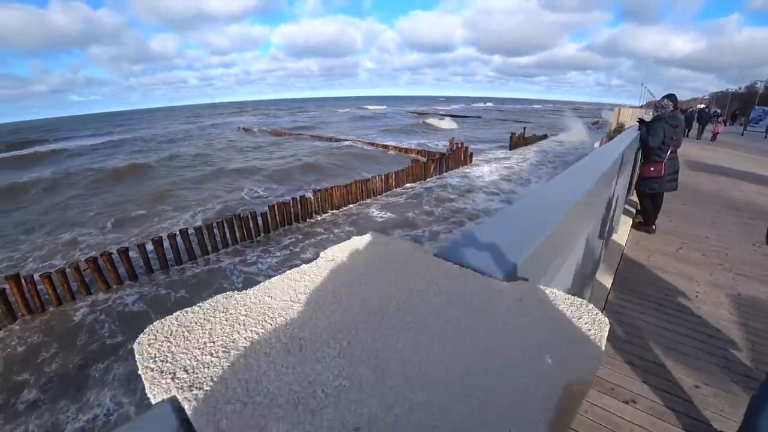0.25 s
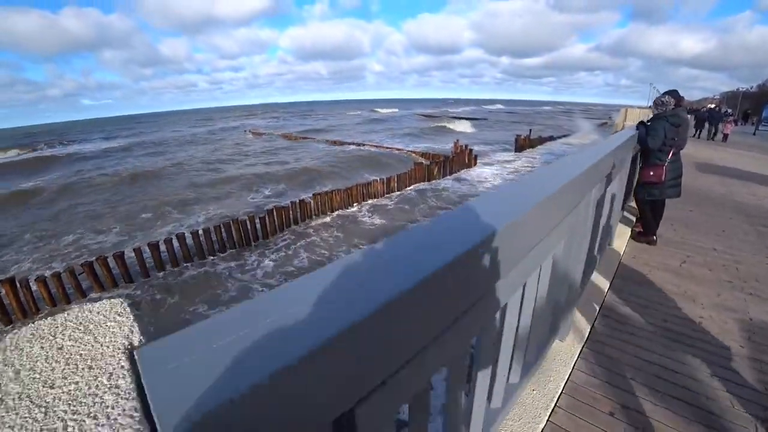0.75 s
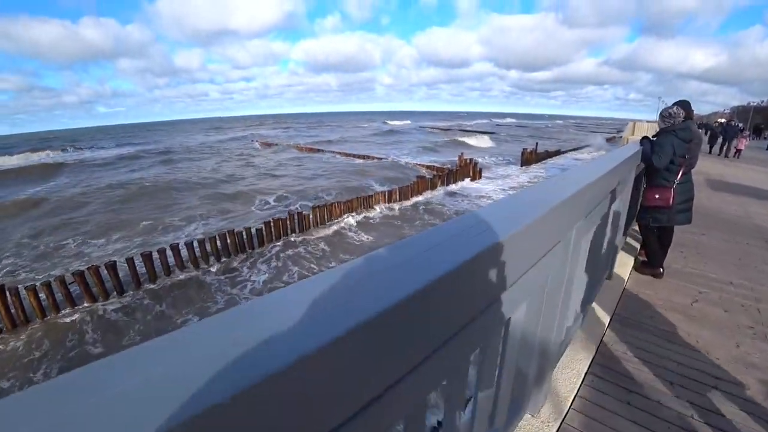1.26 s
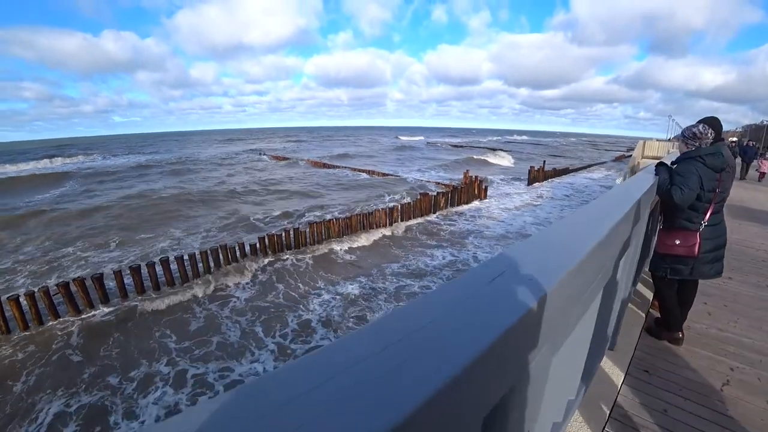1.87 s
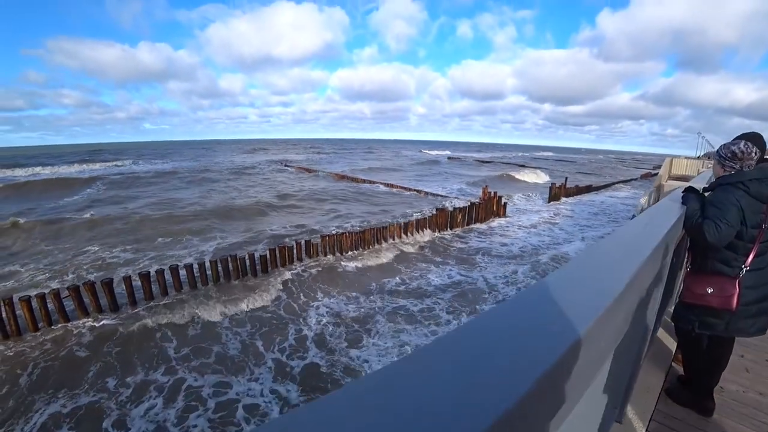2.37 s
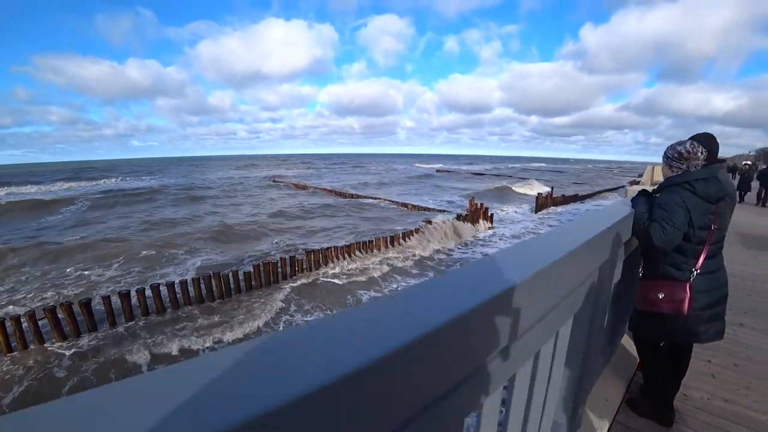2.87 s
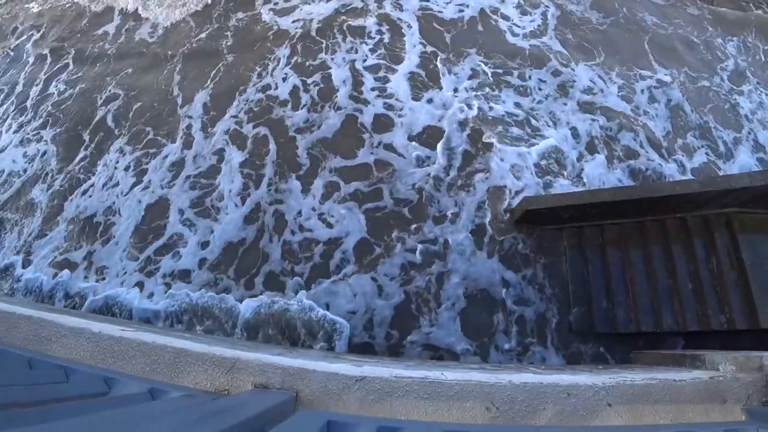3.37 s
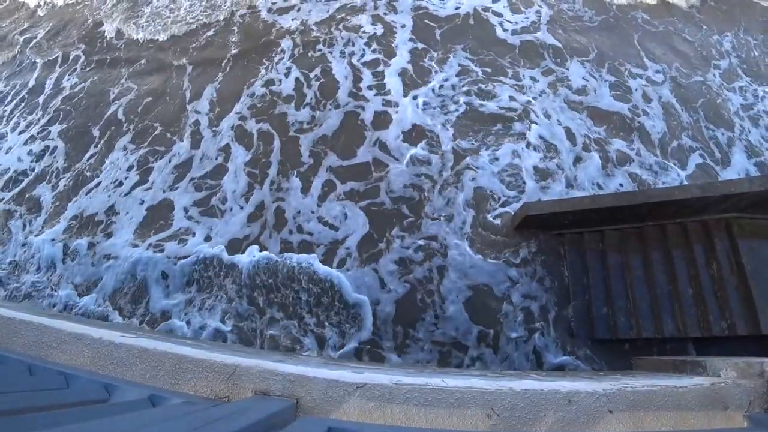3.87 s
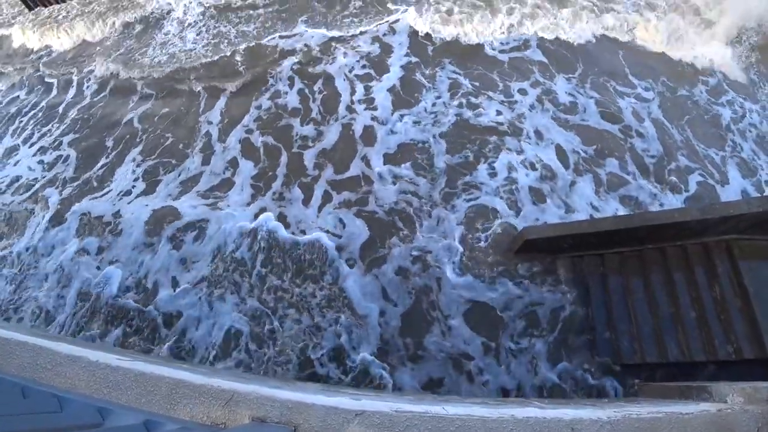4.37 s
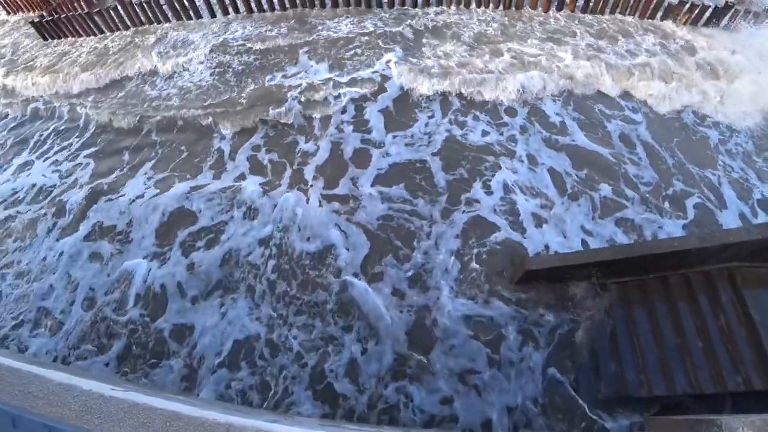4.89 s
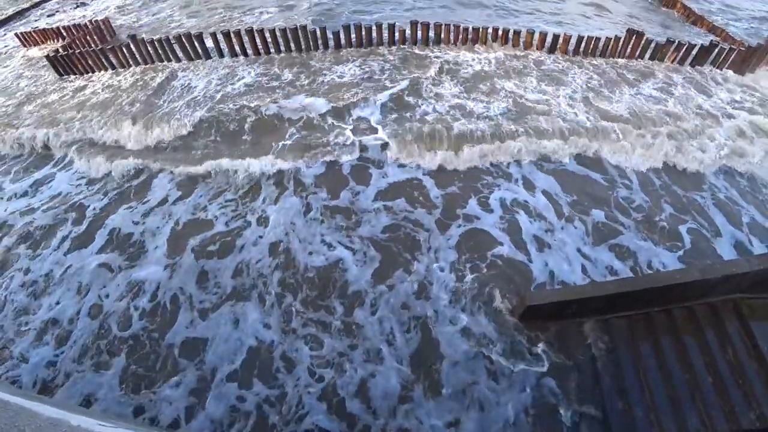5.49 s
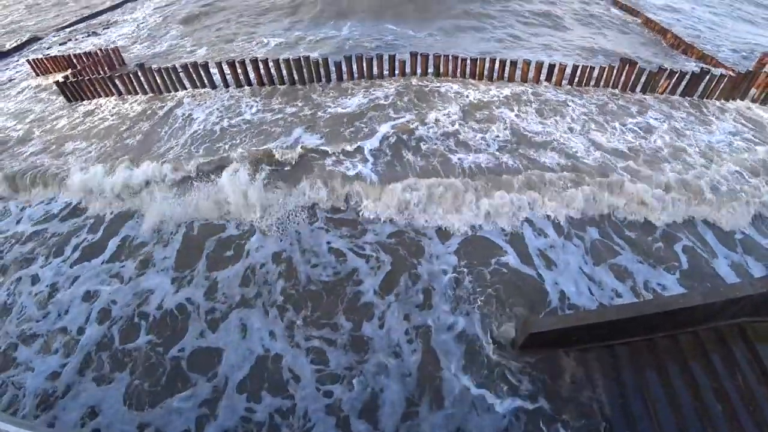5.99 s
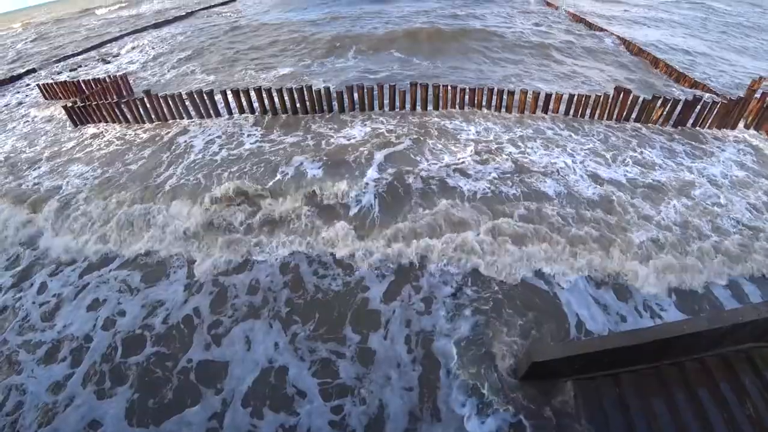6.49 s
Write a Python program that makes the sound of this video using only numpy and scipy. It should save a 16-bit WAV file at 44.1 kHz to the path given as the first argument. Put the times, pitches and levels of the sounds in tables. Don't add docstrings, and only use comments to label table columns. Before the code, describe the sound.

A small, almost mono camera microphone picks up steady broadband surf, roar below and fizzing foam above. Wind is moderate at first, with a hollow wave slap at about 1.4 seconds. From 2.4 seconds gusts batter the microphone, clipping with low thuds and briefly pulling the water down. After a sharp click the fizzing wash builds again beneath fluttering, rumbling wind until the end.

```python
import sys
import numpy as np
from scipy import signal
from scipy.fft import rfft, irfft
from scipy.io import wavfile
from scipy.ndimage import uniform_filter1d

SR = 44100
rng = np.random.default_rng(int(sys.argv[2]) if len(sys.argv) > 2 else 0)


def waveform_to_disk(signal):
    frames = np.transpose(np.atleast_2d(signal))
    scaled = np.clip(frames, -1, 1) * 32767
    samples = np.round(scaled).astype(np.int16)
    wavfile.write(sys.argv[1], SR, samples)


def boost(x):
    u = np.asarray(x, float) / 20
    return 10 ** u


N = 297234
T = np.arange(N) / SR
HZ = np.fft.rfftfreq(N, 1 / SR)
CUT_S = 3.0827

# (time [s], pitch [Hz], level [dB], t60 [s])
SLAP_MODES = [
    (1.411, 124, -12.5, 1.1),
    (1.415, 378, -17, .35),
    (1.415, 230, -19, .15),
]
# (time [s], fizz [dB], roar minus fizz [dB])
SURF_LEVELS = [(0, -25, 4.5), (.45, -25, 5.5), (.88, -23.5, 4), (1.0, -24.5, 4.5), (1.4, -22.5, 3.5),
               (1.95, -21, 1.5), (2.3, -21.5, 2), (2.5, -28.5, 3), (3.08, -26.5, 5), (3.085, -33.5, 2.5),
               (3.7, -28.5, 0), (4.0, -26, -0.5), (4.7, -25.5, -2), (5.22, -26, -3), (5.4, -31, 0),
               (5.75, -32, -0.5), (6.0, -28.5, -1.5), (6.74, -27, 0)]
# (frequency [Hz], level [dB per Hz])
WATER_COLOUR = [(88, -13), (150, -5), (179, -1.5), (215, -2.5), (471, -5), (544, -3), (737, -5.5),
                (1460, -7.5), (3760, -9), (5880, -7), (10800, -23), (14000, -124), (22000, -120)]
# (time [s], swell [dB])
SPRAY_CRESTS = [(.1, 2), (1.38, 2), (1.85, 0.5), (2.91, 1.5), (3.33, 1), (3.68, 2), (3.985, 4), (4.17, 1),
                (5.98, 1.5), (6.33, 2), (6.44, 3)]
# (time [s], depth [dB])
GAIN_DUCKS = [(.493, 2.5), (.53, 5), (.6, 1.5), (.91, 2), (1.427, 3), (2.115, 1.5), (2.434, 3),
              (2.525, 5.5), (2.654, 3), (2.722, 9), (2.8, -1), (3.532, 3.5), (3.8, 6.5), (4.071, 2.5),
              (4.19, 2), (4.27, 4), (4.32, 4.5), (4.37, 3.5), (4.44, 5), (4.62, 3.5), (4.789, 4),
              (4.869, 4.5), (4.989, 4.5), (5.248, 1.5), (5.667, 1), (5.787, 2.5), (6.266, 4), (6.356, 2.5),
              (6.465, 2.5), (6.645, 6.5)]
# (time [s], buffet [dB], flutter minus buffet [dB], extra rustle [dB])
WIND_LEVELS = [(0, -33.5, 1.2, 0.0), (0.2, -25.5, -5.5, -2), (0.7, -24, -8, -6), (1.1, -29.5, 0, 7.5),
               (1.55, -37, 11.5, 7), (2.05, -32.5, -2.7, -2), (2.3, -21, -8.5, 9), (2.5, -13, -5, -4),
               (3.08, -16.1, -7, -3), (3.085, -15.5, -4, -2.5), (3.45, -15, -8, 6), (3.75, -14.5, 2.7, 6),
               (3.9, -16.5, -7, -10), (4.25, -15, -5, -1), (4.6, -14.5, -13, 1), (4.9, -19, 0.1, -0.5),
               (5.8, -12, -7, -3), (6.74, -17.0, -8, 2.5)]
# (frequency [Hz], level [dB per Hz])
WIND_COLOUR = [(8.8, -33), (15, -1), (43, -0.5), (69, -2), (105, -5), (230, -19), (600, -31.5), (780, -38),
               (1320, -120)]
# (time [s], change [dB])
BUFFET_SWELLS = [(.15, 7.5), (.429, -16), (.512, 15), (.738, -9), (.828, -16), (.908, 10), (1.008, -9),
                 (1.656, 9.5), (2.135, 4), (2.883, -6), (2.94, 7.5), (2.983, -12), (3.213, -2), (3.632, -7),
                 (3.851, 2), (4.23, -5), (4.44, 5), (4.49, -3), (4.809, 3.8), (4.869, 7.3), (5.039, 8),
                 (5.108, 2), (5.268, 0), (5.33, -13), (5.527, 3.5), (5.587, -3.9), (5.966, -6), (6.356, 6),
                 (6.425, -10), (6.655, 8)]
# (time [s], change [dB])
FLUTTER_PUFFS = [(.08, 9.5), (.15, 10), (.529, 14), (2.255, 8), (2.405, -12), (2.644, 8), (2.983, -14),
                 (3.093, 6), (3.213, 7), (3.362, 3.5), (3.452, 9.5), (3.632, -8.3), (3.741, -5.5),
                 (3.911, 8), (4.32, 8.5), (4.42, 7), (4.6, 8.5), (4.679, 2), (4.869, 8.5), (4.979, 10),
                 (5.039, -4), (5.108, 4), (5.188, 4.5), (5.368, 6.5), (5.847, 3), (6.066, 5), (6.196, 5.5),
                 (6.356, 6), (6.425, -2), (6.655, 4)]
# (time [s], length [ms], pressure before [full scale], swing after [full scale])
CAPSULE_STOPS = [(2.442, 3.5, -0.12, 0.51), (2.4891, 3.2, -0.038, -0.78), (2.545, 3.4, -0.14, 0.48),
                 (2.6592, 3.7, -0.31, 0.63), (2.721, 6.7, -0.4, 0.57), (2.8034, 8.6, -0.22, 0.84),
                 (3.813, 5.5, 0.31, -0.58), (4.381, 6.2, 0.3, -0.39), (4.8104, 3.5, -0.38, 0.75),
                 (4.8812, 4.6, 0.53, -0.52), (5.248, 4.2, -0.42, 0.56), (5.2816, 5.3, 0.75, -0.61),
                 (5.524, 2.2, -0.53, 0.95), (5.7876, 3.6, 0.62, -0.66), (6.4752, 5.9, -0.22, 0.45),
                 (6.665, 3.3, 0.17, -0.46)]


def unit(x):
    return x / np.sqrt(np.mean(x ** 2))


def curves(rows):
    s, *columns = np.transpose(rows)
    return [np.interp(T, s, c) for c in columns]


def swells(rows, width_s):
    return sum(db * np.exp(-((T - s) / width_s) ** 2) for s, db in rows)


def walk(rate):
    hold = int(SR / rate)
    steps = np.repeat(rng.standard_normal(N // hold + 1), hold)
    slewed = uniform_filter1d(uniform_filter1d(steps, hold), hold)
    return unit(slewed[:N])


def bands(x, spectrum, centres_hz):
    hz, db = np.transpose(spectrum)
    octave = np.log(HZ + 1)
    coloured = rfft(x) * boost(np.interp(octave, np.log(hz), db))
    for k in range(len(centres_hz)):
        only_k = np.arange(len(centres_hz)) == k
        yield irfft(coloured * np.interp(octave, np.log(centres_hz), only_k), N)


def slap():
    out = np.zeros(N)
    for s, hz, db, t60 in SLAP_MODES:
        age = np.clip(T - s, 0, None)
        onset = 1 - np.exp(-age / 0.009)
        out += boost(db - 60 * age / t60) * np.sin(2 * np.pi * hz * age) * onset
    return out


def bubbles(rate, spread_db, smear_ms):
    pops = (rng.random(N) < rate / SR) * boost(spread_db * rng.exponential(size=N))
    tail = np.exp(-1000 / (smear_ms * SR))
    return unit(rng.standard_normal(N) * signal.lfilter([1], [1, -tail], pops))


def ducking():
    attack_s, release_s, release_bend = 0.01, 0.13, 1.05
    loss = np.zeros(N)
    for s, depth_db in GAIN_DUCKS:
        age = np.clip(T - s, 0, None)
        recovery = np.exp(-(age / release_s) ** release_bend)
        loss += depth_db * np.minimum(age / attack_s, 1) * recovery
    return loss


def surf():
    fizz_db, roar_db = curves(SURF_LEVELS)
    fizz_db = fizz_db + swells(SPRAY_CRESTS, 0.025) - ducking()
    wash_db = roar_db - 5
    water = unit(rng.standard_normal(N) + 0.28 * bubbles(1500, 2.8, 1.3))
    centres_hz = 110 * 2 ** (np.arange(14) / 2)
    parts = list(bands(water, WATER_COLOUR, centres_hz))
    fizz_rms = np.sqrt(np.mean(sum(parts[10:]) ** 2))
    out, shared = 0, walk(8.1)
    turns = np.log([900, 2500, 4600])
    for hz, part in zip(centres_hz, parts):
        shared = unit(shared + 0.97 * walk(5.8))
        roar = np.interp(np.log(hz), turns, [0.84, 0.044, 0.036])
        wash = np.interp(np.log(hz), turns, [0.33, 0.75, 0.0052])
        strength_db = roar * (roar_db + 1.5) + wash * (wash_db + 2.0)
        flicker_db = 0.4 * shared + 0.88 * walk(17)
        out = out + part * boost(strength_db + flicker_db)
    return out / fizz_rms * boost(fizz_db + 1.86)


def gusts():
    buffet_db, flutter_db, rustle_db = curves(WIND_LEVELS)
    big_db = swells(BUFFET_SWELLS, 0.032)
    puff_db = swells(FLUTTER_PUFFS, 0.032)
    return buffet_db + big_db, flutter_db + puff_db - big_db, rustle_db


def steady(x, span_s, share):
    power = uniform_filter1d(x ** 2, int(span_s * SR)) + 1e-9
    return unit(x / power ** (share / 2)) * np.std(x)


def push_to_stop(eddies):
    for s, ms, before, after in CAPSULE_STOPS:
        end = s + ms / 1000
        near = slice(int((s - .05) * SR), int((s + .05) * SR))
        t = T[near]
        eddies[near] *= 1 - 0.36 * np.exp(-((t - end) / 0.0089) ** 4)
        eddies[near] += before * np.clip(1 - (s - t) / 0.0064, 0, 1) * (t <= s)
        eddies[near] += 0.8 * after * np.sin(np.pi * np.clip((t - end) / 0.0113, 0, 1))
    return eddies


def wind():
    buffet_db, flutter_db, rustle_db = gusts()
    low, mid, high = bands(rng.standard_normal(N), WIND_COLOUR, [45., 110., 280.])
    low_rms = np.sqrt(np.mean(low ** 2))
    buffet = steady(low, 0.044, 0.74)
    mid = steady(mid, 0.019, 0.14)
    puffs = walk(25)
    flutter = mid * boost(1.1 * puffs + flutter_db + 3.)
    rustle = high * boost(2.7 * puffs + 0.75 * flutter_db + rustle_db - 1.0)
    eddies = (buffet + flutter + rustle) / low_rms * boost(buffet_db - 1.0)
    return push_to_stop(eddies)


def scene():
    return np.tile(surf() + slap() + wind(), (2, 1))


def capsule(x):
    leak = np.exp(-1 / (0.0016 * SR))
    change = signal.lfilter([1, -leak], [1], x)
    for s, ms, _, after in CAPSULE_STOPS:
        stopped = (T > s) & (T < s + ms / 1000)
        change = np.where(stopped, 0.14 * change + (1 - leak) * 0.15 * after, change)
    return signal.lfilter([1], [1, -leak], change)


def patchy_side(mid):
    _, _, tiles = signal.stft(mid, nperseg=2048)
    rows = (13.7 * np.log1p(np.arange(len(tiles)) / 40)).astype(int)
    chance = rng.random((49, tiles.shape[1]))
    power = np.abs(tiles) ** 2
    windy = uniform_filter1d(power[:6].sum(0) / power.sum(0), size=5)
    share = (.03 + .14 * windy) * rng.exponential(size=len(windy))
    patch = (chance < share)[rows] * boost(-17.5 + 0.39 * rows)[:, None]
    scrambled = np.exp(2j * np.pi * rng.random(tiles.shape))
    return signal.istft(tiles * patch * scrambled, nperseg=2048)[1][:N]


def top_cut(x):
    return signal.sosfilt(signal.butter(12, 15800, fs=SR, output="sos"), x)


def record(dry):
    mid = 1.156 * np.tanh(capsule(dry[0]) / 1.086)
    side = patchy_side(mid)
    out = irfft(rfft([mid + side, mid - side]) * (HZ < 11050), N)
    click = -.52 * (T >= CUT_S) * np.exp(-np.abs(T - CUT_S) / 0.0032)
    return top_cut(out + click)


dry = scene()
out = record(dry)
waveform_to_disk(out)
```